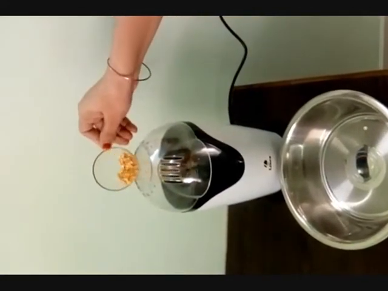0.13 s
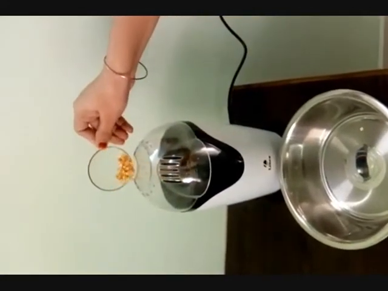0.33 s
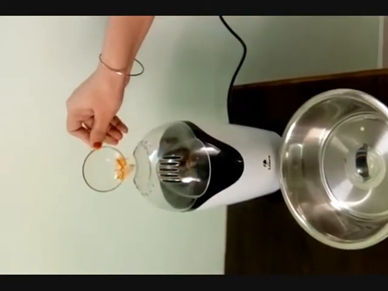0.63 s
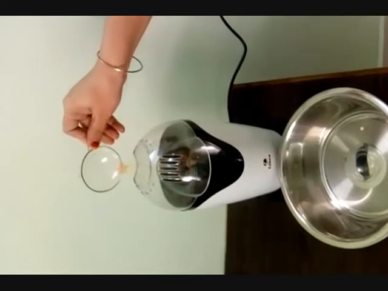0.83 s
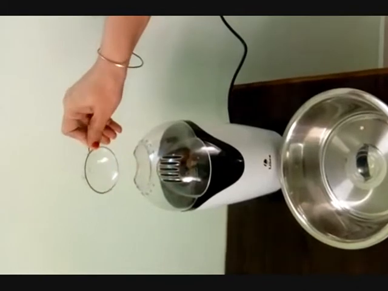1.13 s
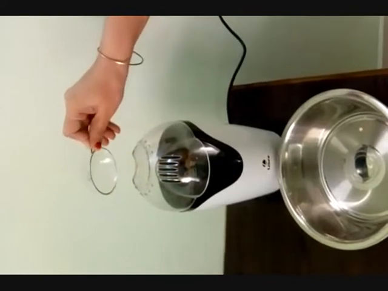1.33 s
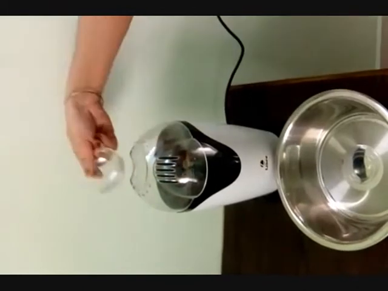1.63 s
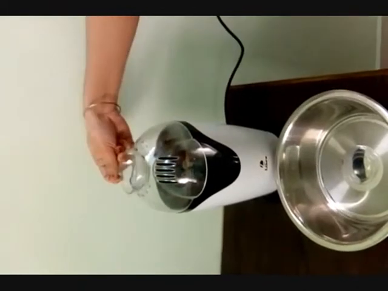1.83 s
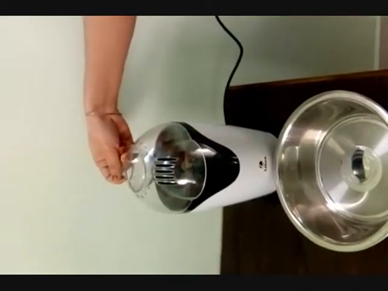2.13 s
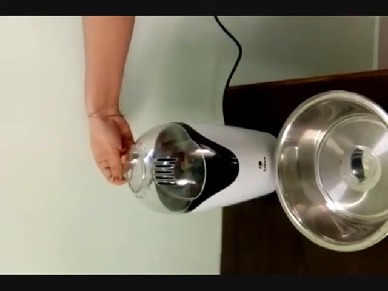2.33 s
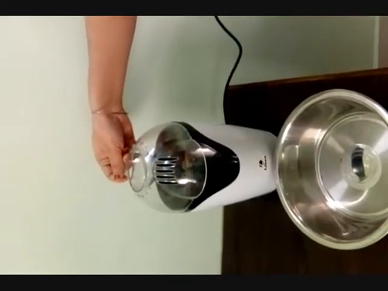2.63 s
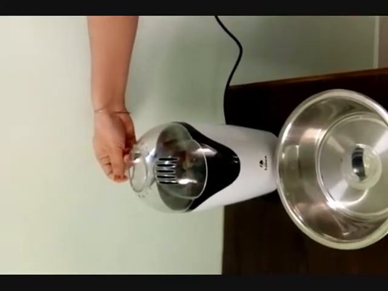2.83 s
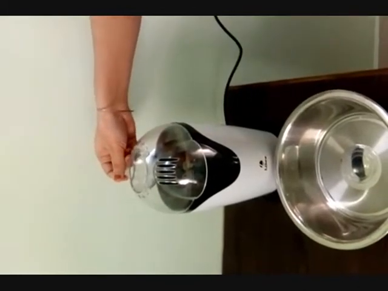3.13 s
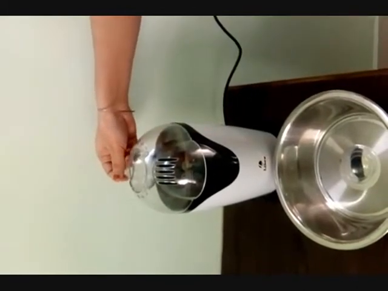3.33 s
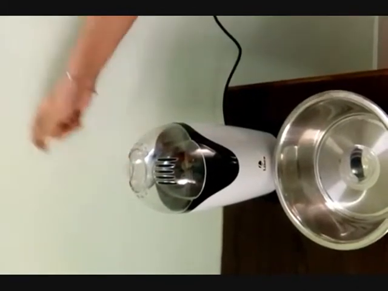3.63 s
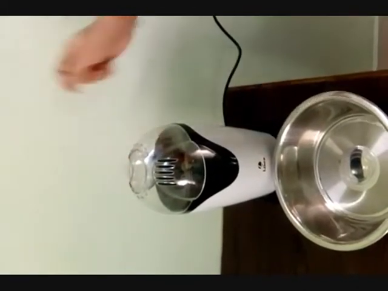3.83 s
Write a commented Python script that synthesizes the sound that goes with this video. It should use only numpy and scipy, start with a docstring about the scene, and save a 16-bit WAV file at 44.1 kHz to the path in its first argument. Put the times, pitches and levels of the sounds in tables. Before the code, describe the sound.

A dense, bright clatter of hard kernels pouring into a resonant chamber weakens within about a second, then hollow plastic cup knocks and a faint scrape follow, in a reverberant kitchen over low background noise.

```python
"""In an echoing kitchen, dry popcorn kernels pour from a plastic cup into the chamber of a popcorn maker.
Many small random hits and a list of louder ones ring the chamber; the last hits die away.
The sound dips briefly, then the cup is knocked and scraped into its seat and wobbles down.
A thin high ringing tone sounds among the first knocks; more faint whistles and a finger's touch follow.
Noise makes a flickering rumble and hiss behind it all."""
import sys
import numpy as np
from scipy import signal
from scipy.fft import rfft, irfft
from scipy.io import wavfile
from scipy.ndimage import uniform_filter1d

SR = 44100
rng = np.random.default_rng(int(sys.argv[2]) if len(sys.argv) > 2 else 0)


def amplitude_ratio(level_db):
    """Convert a level in decibels to the matching linear amplitude (field) ratio."""
    exponent = np.asarray(level_db, float) / 20
    return 10 ** exponent


def digitize_waveform(pressure):
    """Quantize a signal to 16-bit integers and store it at the path in sys.argv[1].

    Rows of a 2-D input are taken as channels; values are limited to [-1, 1].
    """
    field = np.atleast_2d(pressure).T
    bounded = np.clip(field, -1, 1)
    quanta = np.round(bounded * 32767).astype(np.int16)
    wavfile.write(sys.argv[1], SR, quanta)


N = 176400
T = np.arange(N) / SR

# All levels in the tables are relative: they shape or balance a sound before its later gains.
# How strongly the kernels flow: [t/s, level/dB]
FLOW = [(0.0, -12), (0.216, -19.5), (0.266, -24), (0.28, -21), (0.33, -17.5), (0.44, -19.5), (0.576, -24),
        (0.594, -26.5), (0.634, -17), (0.652, -29), (0.712, -27.5), (0.726, -32), (0.74, -26.5),
        (0.762, -25.5), (0.848, -24.5), (0.895, -27), (0.92, -24), (0.958, -23), (1.0, -24.5),
        (1.076, -28.5), (1.084, -26), (1.188, -40), (1.63, -61)]
# Loudest kernel hits, each with its own ring: [t/s, level/dB, f/Hz]
HITS = [(0.0223, -6, 6560), (0.0533, -8, 6840), (0.0852, -9, 5210), (0.1054, -5.5, 5450),
        (0.122, -4.5, 6200), (0.1695, -7, 6770), (0.1831, -0.5, 6160), (0.2094, -10.5, 2510),
        (0.2753, -5, 5970), (0.2892, -11.5, 6400), (0.3004, -6.5, 5800), (0.3202, -9.5, 3370),
        (0.34, -11, 3180), (0.3636, -11, 3200), (0.451, -13.5, 6100), (0.4738, -9, 5950),
        (0.4924, -10.5, 6560), (0.5237, -13.5, 3310), (0.548, -13, 2250), (0.5658, -10.5, 6460),
        (0.612, -10.5, 2350), (0.6295, -8, 4640), (0.6873, -16, 6200), (0.7213, -8.5, 6240),
        (0.7572, -11.5, 5520), (0.7721, -7.5, 4580), (0.7968, -10.5, 4740), (0.8689, -19, 3640),
        (0.8789, -13, 2230), (0.9018, -9.5, 4600), (0.9123, -12.5, 4740), (0.9417, -11.5, 2300),
        (0.9575, -9.5, 4820), (0.967, -14, 3650), (0.9814, -13, 3700), (1.0081, -12, 6200),
        (1.06, -17.5, 5440), (1.0804, -12, 6530), (1.1074, -19, 3600), (1.1483, -19, 3320),
        (1.205, -26.5, 2510), (1.247, -30, 3130), (1.29, -32, 3400), (1.3434, -36, 2470),
        (1.3813, -40, 3230), (1.4331, -40, 3360), (1.4464, -38, 3130), (1.4701, -46, 5570),
        (1.5168, -41.5, 4120), (1.5287, -45, 2490), (1.5447, -42, 3530)]
# Ringing tones (modes) of chamber and cover: [f/Hz, width/Hz, level/dB, change as the pile grows/(dB/s)]
CHAMBER_MODES = [(254, 32, -13.5, -3), (370, 85, -11.5, -3), (749, 20, -4, 1.5), (872, 8.1, -6.5, 0.5),
                 (1164.5, 12, -5, -3.5), (1228.3, 21, 0.5, -3.5), (1374, 31, -8.5, 0.5),
                 (1596, 48, -14, 3.5), (1922, 24, -0.5, -4), (2264, 120, 3.5, -4), (2510, 43, -0.5, 6),
                 (3140, 24, 0.5, 3), (3320, 11, 3.5, 2.5), (3690, 24, 0, 0), (3834, 220, -0.5, 7),
                 (4620, 150, -2, 6), (4952, 50, -0.5, 3), (5158, 260, 4.5, -4), (5680, 91, -0.5, -5.5),
                 (6200, 180, 0.5, -2), (6260, 92, -2, -7), (6580, 110, -4, -11.5), (6990, 55, -6.5, 0),
                 (10100, 760, -13, -11.5)]
# Colour of a kernel's bare tick: [f/Hz, level/dB]
TICK_COLOUR = [(35, -67), (60, -37.5), (240, -16.5), (536, -17), (749, -7), (1050, -11.5), (1250, -7),
               (2100, -5), (2800, -7), (3500, 0), (4200, -7.5), (5000, -3), (6400, -2), (7200, -5),
               (9140, -31), (10900, -16), (11500, -25.5), (12200, -32), (16200, -72), (22000, -120)]
# Knocks of the cup: [t/s, level/dB, brightness/(dB/octave), low ring f/Hz, low ring level/dB]
KNOCKS = [(1.83, -47, 2, 746, -40), (1.838, -28, -0.5, 424, -27.5), (1.869, -30, -4, 634, -36),
          (1.924, -39.5, -2.5, 642, -44), (2.003, -35.5, 0.5, 380, -31), (2.15, -50, 8, 483, -37),
          (2.189, -77, 12, 505, -49), (2.253, -60, 8, 419, -43.5), (2.274, -56, -12, 427, -48),
          (2.313, -66, 9, 470, -58)]
# Ringing tones of the cup: [f/Hz, level/dB, time to fade 60 dB/s]
CUP_MODES = [(480, -11, .06), (646, -4, .07), (888, -2, .4), (1300, -7, .07), (1420, -9, .05),
             (1567, -7, .06), (1760, -11, .07), (1960, -12, .05), (2220, -13, .03), (2350, -13, .03),
             (2555, -16, .05), (2880, -16, .04), (3070, -17, .04), (3290, -15, .05), (4080, -19, .035),
             (4400, -25, .03)]
# Colour of the dull crack in a knock: [f/Hz, level/dB]
CRACK_COLOUR = [(60, -45), (120, -2), (480, -6), (700, 1.5), (1100, -5), (1450, 2.5), (2200, -15.5),
                (3400, -5), (4300, -46), (7000, -32), (9000, -69)]
# The cup's scrape, one row: [t/s, length/s, level/dB, low ring start f/Hz, its end f/Hz, its level/dB]
SCRAPE = (2.14, .18, -66, 530, 410, -62)
# Ringing tones of the seat: [f/Hz, level/dB, time to fade 60 dB/s]
SEAT_MODES = [(750, -2, .015), (1320, -2, .04), (1770, -5, .03), (2550, -6, .02), (3280, 0, .018)]
# Ringing tones of the touched cover: [f/Hz, level/dB, time to fade 60 dB/s]
COVER_MODES = [(400, -3, 0.03), (800, -4, 0.05), (2200, -10, .03), (2330, -6, 0.03), (3280, -8, 0.02)]
# Faint thin whistles: [t/s, length/s, start f/Hz, end f/Hz, level/dB]
WHISTLES = [(1.86, .065, 6150, 6330, -65), (2.45, .09, 4300, 4480, -78), (2.535, .07, 4420, 4300, -72),
            (2.615, .045, 4450, 4330, -79), (2.695, .065, 3900, 3870, -73), (2.49, .08, 4950, 5050, -78)]
# Colour of the background: [f/Hz, level/dB]
FLOOR_COLOUR = [(20, -28.5), (45, -14), (118, 1), (150, -5.5), (255, -3.5), (324, -8.5), (420, -11.5),
                (600, -15.5), (1760, -21), (6300, -27.5), (7300, -35), (9000, -60)]
# Fading of the kitchen's echo: [f/Hz, time to fade 60 dB/s]
ROOM_FADE = [(200, 0.89), (1000, 0.56), (4000, 0.43), (7000, 0.15), (9000, 0.2)]

DROPOUT_S, DROPOUT_LENGTH_S = 1.634, 0.02
PLASTIC_TOP_HZ = 3500  # softens the pushes on cup and cover


def level(x, db):
    """Set the rms level."""
    return x * amplitude_ratio(db) / np.sqrt(np.mean(x ** 2))


def colour(x, table):
    """Filter by (Hz, dB) points, joined along a log frequency axis."""
    hz, db = np.array(table).T
    f = np.fft.rfftfreq(len(x), 1 / SR) + 1
    gain = amplitude_ratio(np.interp(np.log(f), np.log(hz), db))
    return irfft(rfft(x) * gain, len(x))


def lowpass(x, hz):
    """Soften everything above hz."""
    return signal.sosfilt(signal.butter(2, hz, fs=SR, output="sos"), x)


def ring(x, hz, t60):
    """A tone that dies away after each push, without extra bass; a unit pulse starts a unit cosine."""
    r = np.exp(-np.log(1000) / (max(t60, 1 / 1000) * SR))
    w = 2 * np.pi * hz / SR
    return signal.lfilter([.5, 0, -.5], [1, -2 * r * np.cos(w), r * r], x)


def pulses(s, size):
    """One-sample pulses at the given times."""
    return np.bincount(np.minimum((s * SR).astype(int), N - 1), size, N)


def tick(x):
    """Each hit gives a short fading rattle of noise, its spectrum partly evened, with the tick colour."""
    fade_t60_s = 0.006  # before the evening
    burst = rfft(rng.standard_normal(512) * 1000 ** (-T[:512] / fade_t60_s))
    rattle = irfft(burst / np.abs(burst) ** .5)
    return colour(signal.fftconvolve(x, rattle)[:len(x)], TICK_COLOUR)


def chamber(s, size):
    """Each hit ticks and rings the chamber in its own mix, which shifts as the pile grows."""
    scatter_db, pile_full_s = 5.0, 1.05
    modes_db, tick_db = -1, 1.5
    scatter = scatter_db * rng.standard_normal((len(s), len(CHAMBER_MODES)))
    pile_shift = np.outer(np.minimum(s, pile_full_s), np.array(CHAMBER_MODES)[:, -1])
    mix = amplitude_ratio(scatter + pile_shift)

    def spots(strength):
        """Deal the hits in turn to eight landing spots, one per row."""
        return np.array([pulses(s[j::8], strength[j::8])[:N // 2] for j in range(8)])

    modes = 0
    for k, (hz, width, db, _) in enumerate(CHAMBER_MODES):
        # a wider tone dies away sooner
        modes = modes + amplitude_ratio(db) * np.sqrt(width) * ring(spots(size * mix[:, k]), hz, 2.2 / width)
    ticks = np.array([tick(x) for x in spots(size)])
    both = level(modes, modes_db) + level(ticks, tick_db)
    return np.pad(both, ((0, 0), (0, N // 2)))


def kernels():
    """Random small hits follow the flow; loud hits are quick bursts of contacts with a ring of their own."""
    kernels_per_s, size_spread_db, size_max_db = 1500, 3.5, 10
    draw = rng.random((9000, 3))
    s = np.cumsum(-np.log(draw[:, 0])) / kernels_per_s
    on = s < DROPOUT_S
    size_db = np.minimum(-size_spread_db * np.log(draw[:, 1]), size_max_db)
    size = amplitude_ratio(size_db) * np.sign(draw[:, 2] - .5)
    stream = level(chamber(s[on], size[on]), -18.5)  # level before the flow curve
    stream = stream * amplitude_ratio(np.interp(T, *np.array(FLOW).T))

    contact_gap_s = 0.0011  # on average, within one loud hit
    ring_db, ring_t60_s, body_db = -14, 0.012, -3
    at, db, hz = np.array(HITS).T
    late = np.cumsum(rng.exponential(1, (len(at), 6)) * [0, 1, 1, 1, 1, 1], axis=1) * contact_gap_s
    shape = np.array([.9, -1, .8, -.7, .6, -.4])  # push of each contact
    body = chamber((at[:, None] + late).T.ravel(), (amplitude_ratio(db)[:, None] * shape).T.ravel())
    body *= amplitude_ratio(db.max() + body_db) / np.abs(body.sum(axis=0)).max()
    for k in range(len(at)):
        push = pulses(at[k] + late[k], shape * amplitude_ratio(db[k] + ring_db))
        body[k % len(body)] += ring(push, hz[k], ring_t60_s)
    return stream + body


def cup():
    """A scuffed contact rings the cup, tilted per knock, over a low ring, a thud and a noisy crack."""
    ring_db, mix_scatter_db, scuff = -10, 2.5, 0.9
    contact_s, soft_push_s, low_t60_s = 0.004, 0.0012, 0.045
    thud_hz, thud_db, thud_t60_s = 141.6, -11, 0.15
    crack_db, crack_t60_s = -8.5, 0.14  # crack level before its rise and fade
    out, t = np.zeros((4, N)), T[:SR // 2]
    soft = np.sin(np.pi * np.minimum(t / soft_push_s, 1)) ** 2
    for k, (s, db, tilt_db, low_hz, low_db) in enumerate(KNOCKS):
        rub = rng.standard_normal(len(t)) * t / contact_s * np.exp(-2 * t / contact_s)
        push = lowpass((t == 0) + scuff * rub / np.linalg.norm(rub), PLASTIC_TOP_HZ)
        body = amplitude_ratio(thud_db) * ring(push, thud_hz, thud_t60_s)
        for hz, mode_db, t60 in CUP_MODES:
            scatter = mix_scatter_db * rng.standard_normal()
            body = body + amplitude_ratio(mode_db + tilt_db * np.log2(hz / 1000) + scatter) * ring(push, hz, t60)
        tilted = [(hz, d + tilt_db * np.log2(hz / 1000)) for hz, d in CRACK_COLOUR]
        crack = level(colour(rng.standard_normal(len(t)), tilted), crack_db)
        crack = crack * 1000 ** (-t / crack_t60_s) * (1 - np.exp(-4 * t / contact_s))
        low = amplitude_ratio(low_db) * ring(soft / soft.sum(), low_hz, low_t60_s)
        start = int(s * SR)
        out[k % len(out), start:start + len(t)] += amplitude_ratio(db) * (amplitude_ratio(ring_db) * body + crack) + low
    return out


def scrape():
    """Dense uneven slips ring the seat while a rough low ring slides down in pitch."""
    s, length, db, hz0, hz1, low_db = SCRAPE
    u = np.clip((T - s) / length, 0, 1)
    swell = np.sqrt(np.sin(np.pi * u).clip(0)) * (u < 1)
    slips = rng.standard_normal(N) ** 3 * swell  # cubing makes a few slips stand out
    rattle = sum(amplitude_ratio(d) * level(ring(slips, hz, t60), 0) for hz, d, t60 in SEAT_MODES)
    rough = uniform_filter1d(rng.standard_normal(N), size=300)
    low = rough * swell * np.sin(2 * np.pi * np.cumsum(hz0 + (hz1 - hz0) * u) / SR)
    both = level(rattle, db) + level(low, low_db)
    return (both / np.sqrt(N / SR / length))[None]


def touch():
    """A light finger touch: a short soft rub of noise rings the cover."""
    start_s, length_s, push_db = 2.975, 0.085, -55
    rub = rng.standard_normal(N) * np.sin(np.pi * np.clip((T - start_s) / length_s, 0, 1))
    rub = lowpass(rub, PLASTIC_TOP_HZ)
    rub = rub / np.linalg.norm(rub)
    return amplitude_ratio(push_db) * sum(amplitude_ratio(db) * ring(rub, hz, t60) for hz, db, t60 in COVER_MODES)[None]


def whistles():
    """Faint high sine tones that glide, waver, swell and fade."""
    waver_hz, flicker_db = 30, 3
    waver = uniform_filter1d(rng.standard_normal((2, N)), size=300, axis=1)
    waver = waver / waver.std()
    out = 0
    for s, length, hz0, hz1, db in WHISTLES:
        u = np.clip((T - s) / length, 0, 1)
        hz = hz0 + (hz1 - hz0) * u + waver_hz * waver[0]
        tone = np.sqrt(2) * np.sin(2 * np.pi * np.cumsum(hz) / SR)
        swell = np.sqrt(np.sin(np.pi * u).clip(0)) * (u < 1)
        out = out + amplitude_ratio(db + flicker_db * waver[1]) * tone * swell
    return out


def room(x, db):
    """Early echoes and a tail fading band by band; every row of x sounds from its own spot."""
    early_db, early_t60_s = -6.5, 0.05
    t, tail = T[:SR], 0
    noise = rng.standard_normal((2, len(x), SR))
    hz, t60 = np.array(ROOM_FADE).T
    for f in 90 * 2 ** np.arange(0, 7.6, .5):  # half-octave bands
        sos = signal.butter(2, [f / 1.19, f * 1.19], "band", fs=SR, output="sos")
        decay = np.interp(np.log(f), np.log(hz), t60)
        tail = tail + signal.sosfilt(sos, noise[0]) * 1000 ** (-t / decay) / np.sqrt(decay)
    early = noise[1] * 1000 ** (-t / early_t60_s)
    echo = amplitude_ratio(db) * tail / np.linalg.norm(tail[0]) + amplitude_ratio(early_db) * early / np.linalg.norm(early[0])
    return (x + signal.fftconvolve(x, echo, axes=1)[:, :N]).sum(axis=0)


def background():
    """Coloured noise: a low rumble that flickers over steady hiss."""
    floor_db, flicker_db = -59.5, 2.5  # flicker before smoothing
    x = colour(rng.standard_normal(N), FLOOR_COLOUR)
    low = lowpass(x, 600)
    steps = np.repeat(rng.standard_normal(N // 1500 + 1), 1500)
    walk = uniform_filter1d(steps, size=1500)[:N]
    return level(x + low * (amplitude_ratio(flicker_db * walk) - 1), floor_db)


def scene():
    """The pour grows bassier, its treble fades late, its echo ends in the dropout; the cup follows."""
    bass_hz, bass_rise_db_per_s = 580, 10
    treble_hz, treble_fades_s, treble_fade_db_per_s = 6550, 1.116, -110
    pour_room_db, cup_room_db = 0, 3
    pour = room(kernels(), pour_room_db) * (T < DROPOUT_S + DROPOUT_LENGTH_S / 2)
    bass = signal.sosfiltfilt(signal.butter(2, bass_hz, fs=SR, output="sos"), pour)
    treble = signal.sosfiltfilt(signal.butter(6, treble_hz, "high", fs=SR, output="sos"), pour)
    bass_gain = amplitude_ratio(bass_rise_db_per_s * T)
    treble_gain = amplitude_ratio(treble_fade_db_per_s * np.maximum(T - treble_fades_s, 0))
    pour = pour + bass * (bass_gain - 1) + treble * (treble_gain - 1)
    seating = room(cup(), cup_room_db) + room(touch() + scrape(), cup_room_db)
    return (pour + seating + whistles() + background())[None]


def top_cut(x):
    """Nothing passes above the cut-off."""
    return signal.sosfilt(signal.butter(12, 12830, fs=SR, output="sos"), x)


def record(dry):
    """The top is cut; the sound drops out for a moment, and from then on a thin bright hiss runs."""
    top_hz, dropout_db, hiss_db = 12000, -30, -76
    gap = 1. * ((T > DROPOUT_S) & (T < DROPOUT_S + DROPOUT_LENGTH_S))
    gap = uniform_filter1d(gap, size=90)  # soft edges
    dull = signal.sosfilt(signal.ellip(12, .2, 90, top_hz, fs=SR, output="sos"), dry)
    hiss = level(rng.standard_normal(N), hiss_db) * (T > DROPOUT_S)
    return top_cut(dull * amplitude_ratio(dropout_db * gap) + hiss)


dry = scene()
out = record(dry)
digitize_waveform(out)
```